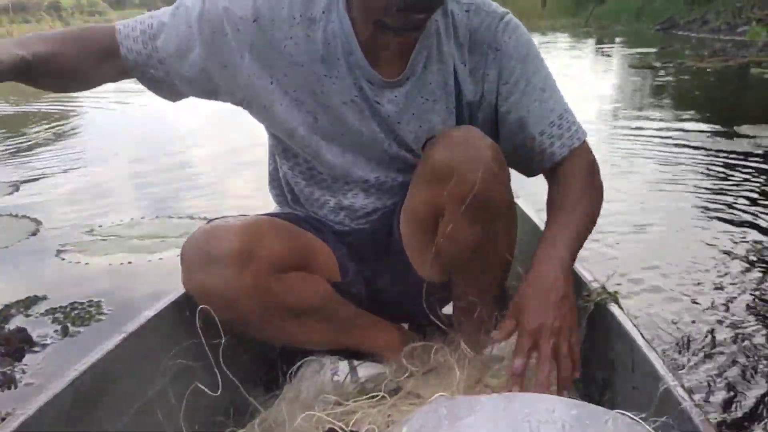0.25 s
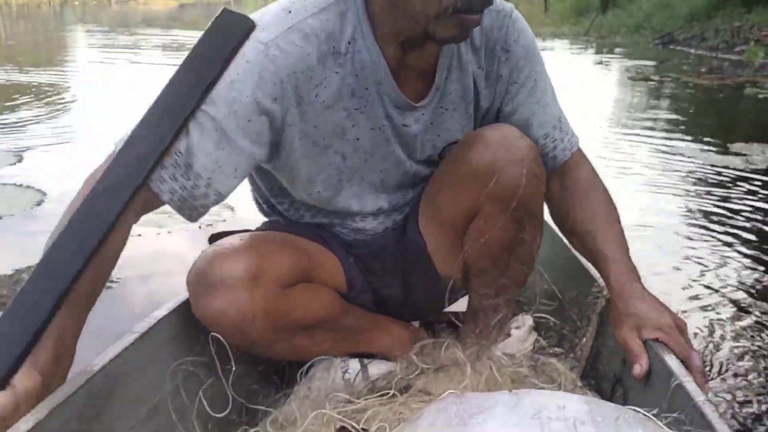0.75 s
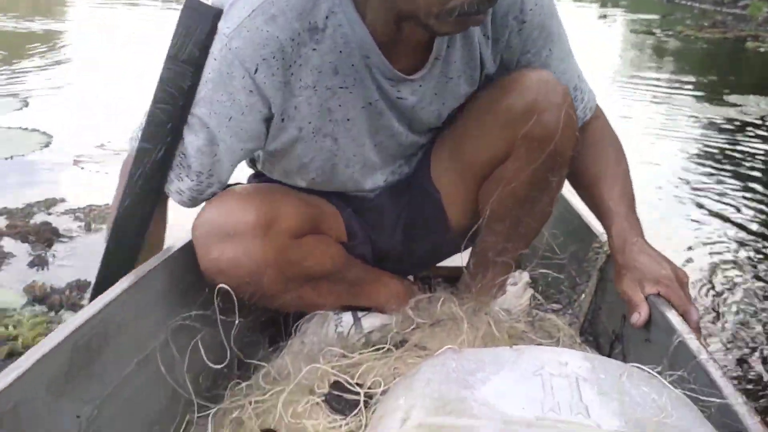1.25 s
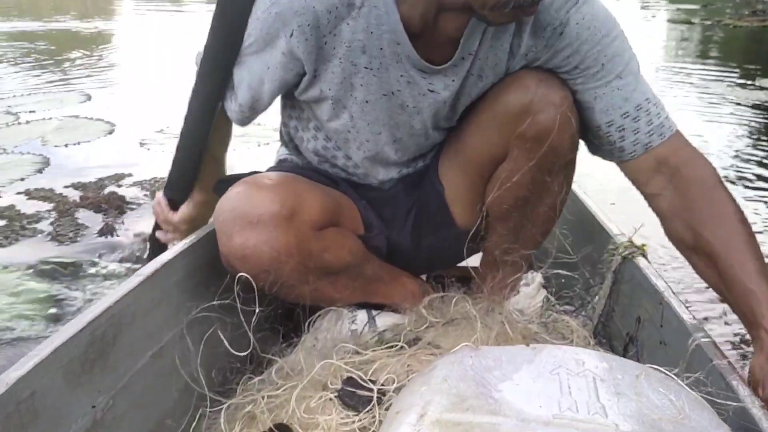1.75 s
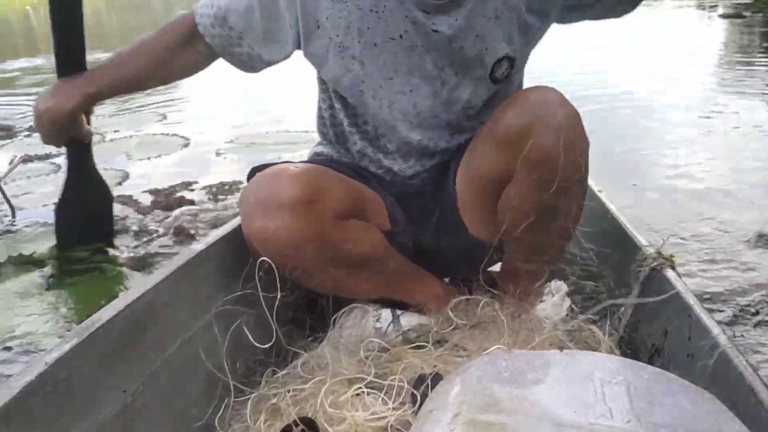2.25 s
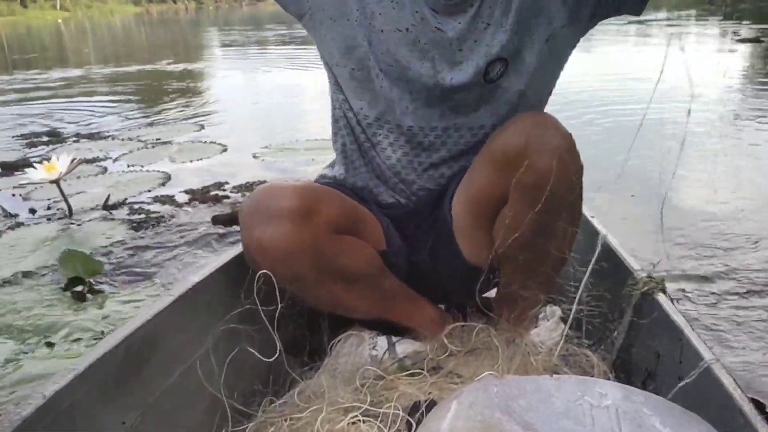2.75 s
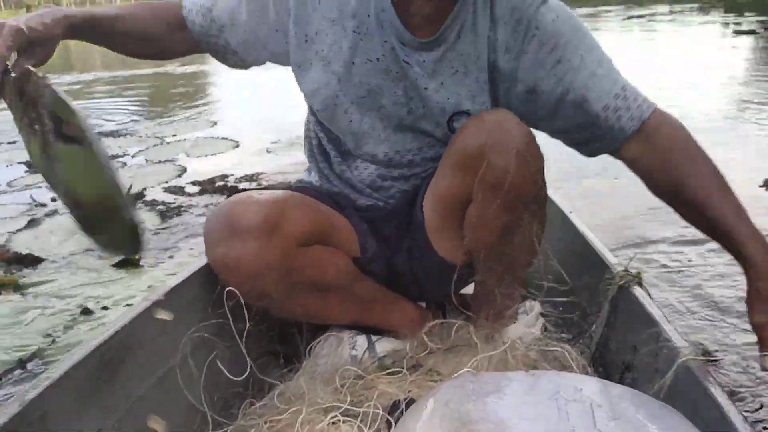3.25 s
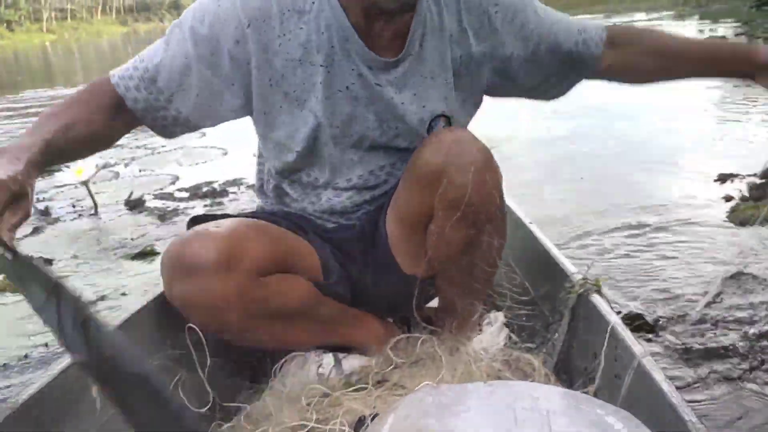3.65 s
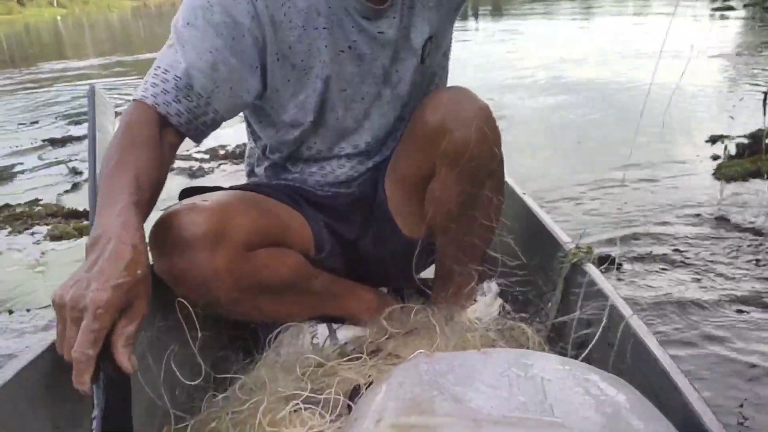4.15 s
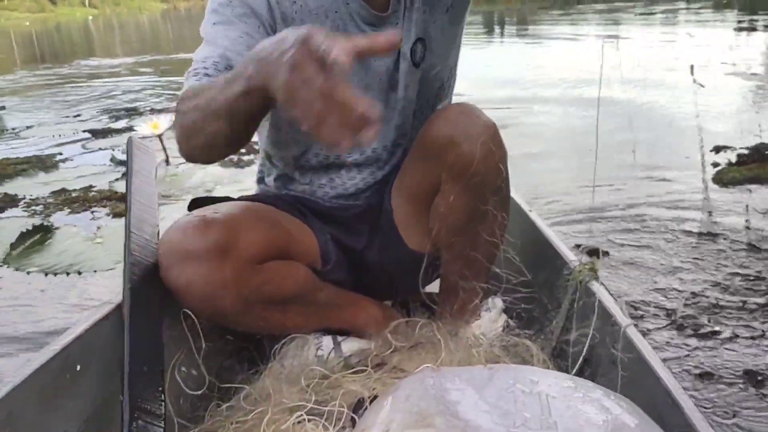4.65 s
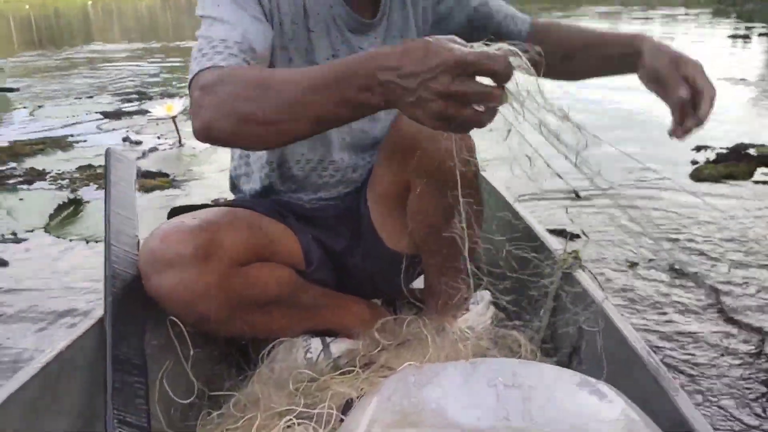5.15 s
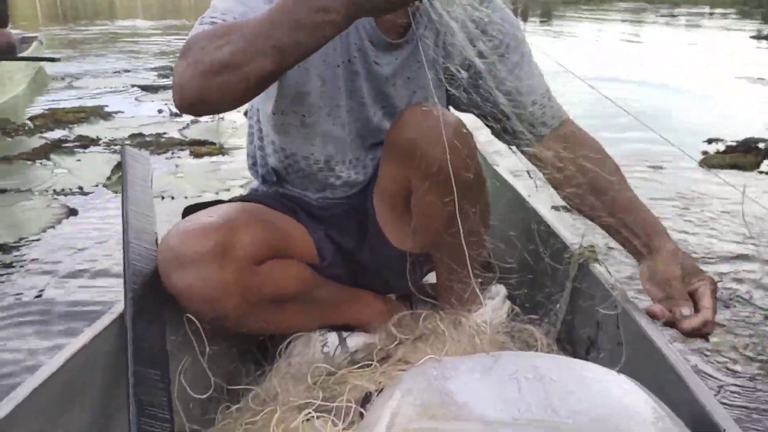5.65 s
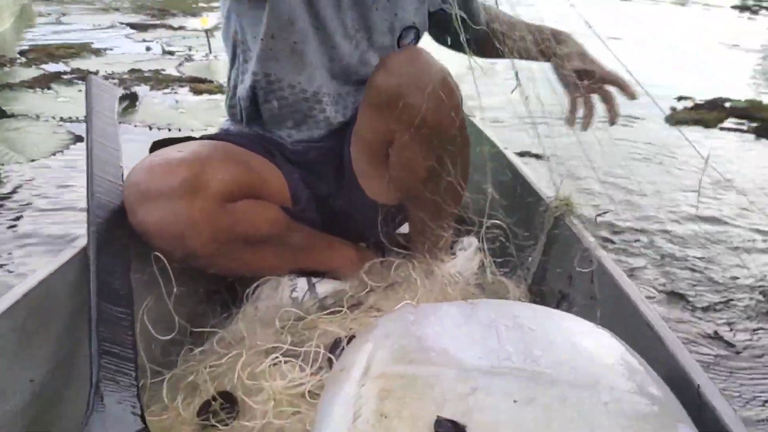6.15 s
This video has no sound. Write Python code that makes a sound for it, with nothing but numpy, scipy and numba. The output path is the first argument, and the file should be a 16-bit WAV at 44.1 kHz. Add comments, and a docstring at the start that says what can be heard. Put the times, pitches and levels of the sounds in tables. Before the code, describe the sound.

Hollow hull knocks, stirred trickling water and a brief crisp net shake, over quiet bank insects, faint honks and thin bird whistles.

```python
"""A paddle knocks the hull of a small boat on still water, stirs and drips, while a wet net is shaken and drawn in.
Blows ring the plank modes; close bubbles, gulps and ticks are short decaying sines; stirred water and the net
are dense showers of such rings, and a smooth rush is banded noise. On the banks, near crickets are pulsed tones
and far insects narrow noise; a far honking bird and small whistling, trilling birds are gliding tones with an echo.
Under everything is a soft hush of shaped noise whose upper bands waver at random; the recorder cuts the top."""
import sys
import numpy as np
from scipy import signal
from scipy.fft import rfft, irfft
from scipy.io import wavfile
from scipy.ndimage import uniform_filter1d
from numba import njit

SR = 44100
rng = np.random.default_rng(int(sys.argv[2]) if len(sys.argv) > 2 else 0)


def unload_wav(signal):
    """Save mono or channel-first audio to the path in sys.argv[1] as 16-bit WAV at rate SR, clipped to [-1, 1]."""
    wavfile.write(
        sys.argv[1],
        SR,
        np.round(np.clip(np.atleast_2d(signal).T, -1, 1) * 32767).astype(np.int16),
    )


N = 282240
T = np.arange(N) / SR


def undb(db):
    """Amplitude factor of a level in dB."""
    return 10 ** (np.asarray(db) / 20)


def unit(x):
    """Scale to rms 1."""
    return x / np.sqrt(np.mean(x ** 2))


def noise():
    """White noise over the whole scene."""
    return rng.standard_normal(N)


def band(x, lo_hz, hi_hz, order=2):
    """Butterworth band-pass."""
    edges_hz = [lo_hz, min(hi_hz, .45 * SR)]
    return signal.sosfilt(signal.butter(order, edges_hz, "band", fs=SR, output="sos"), x)


def walk(rate):
    """Random levels held 1 / rate s and smoothed twice; spread near 1."""
    hold = int(SR / rate)
    steps = np.repeat(rng.standard_normal(N // hold + 1), hold)
    return 1.4 * uniform_filter1d(uniform_filter1d(steps, hold), hold)[:N]


def swell_db(s, swell_s, hold_s, fade_db_per_s):
    """Level in dB under the top: a rise of 15 dB per swell_s up to s, a hold, a steady fade."""
    rise = 15 * np.clip(s - T, 0, None) / max(swell_s, 1e-3)
    return -rise - fade_db_per_s * np.clip(T - s - hold_s, 0, None)


def glide(s, from_hz, to_hz, glide_s):
    """Frequency that slides in a straight line from time s."""
    return from_hz + (to_hz - from_hz) * np.clip((T - s) / glide_s, 0, 1)


def tone(hz):
    """Sine of rms 1 that follows a moving frequency."""
    return np.sqrt(2) * np.sin(2 * np.pi * np.cumsum(hz) / SR)


@njit
def rings(n, s, size, hz, t60, octaves, rise):
    """Decaying sines that may glide up as they fade; rise [s] is the length of the push."""
    out = np.zeros(n)
    for e in range(len(s)):
        start, phase = int(s[e] * SR), 0.
        for i in range(min(int(t60[e] * SR), n - start)):
            t = i / SR
            now_hz = min(hz[e] * 2 ** (octaves[e] * t / t60[e]), .45 * SR)
            phase += 2 * np.pi * now_hz / SR
            fade = np.exp(-np.log(1000) * t / t60[e])
            onset = 1 - np.exp(-(t / rise) ** 2)
            out[start + i] += size[e] * np.sin(phase) * fade * onset
    return out


def grains(count, lo_hz, hi_hz, cycles, scatter_db, octaves, tilt=0.86):
    """A steady random shower of small rings, rms 1; a positive tilt favours the high-pitched ones."""
    place, pitch, luck, length = rng.random((count, 4)).T
    hz = lo_hz * (hi_hz / lo_hz) ** pitch
    size_db = scatter_db * np.minimum(-np.log(1 - luck), 4.5)  # the rare giants are capped
    size = undb(size_db) * (hz / lo_hz) ** tilt
    t60 = cycles * (.5 + length) / hz
    shower = rings(N, place * N / SR, size, hz, t60, octaves * length, 0.00029)
    return unit(band(shower, .9 * lo_hz, 1.1 * hi_hz, order=4))


def bursts(s, db, lo_hz, hi_hz, t60):
    """Short decaying banded noise at each time."""
    kick = np.zeros(N)
    np.add.at(kick, (np.asarray(s) * SR).astype(int), undb(db))
    fade = signal.lfilter([1], [1, -np.exp(-np.log(1000) / (t60 * SR))], kick)
    # make up for the power lost outside the band
    return band(fade * noise(), lo_hz, hi_hz) * np.sqrt(SR / 2 / (hi_hz - lo_hz))


def hull():
    """Each blow is a push and a short rattle that shake the plank modes; a dry crack goes with it."""
    # blows: (time [s], level [dB], upper planks over the thud [dB], crack over the thud [dB])
    knocks = [(0.339, -16.5, -7, -12), (0.721, -39, -9, -18), (1.59, -19.5, 3, -34),
              (1.598, -22.5, -0.5, -34), (1.639, -27, -7.5, -36), (1.717, -26, 0, -33),
              (1.721, -15.5, 3, -38), (1.739, -19, 2.5, -25.5), (1.746, -17, -0.5, -32),
              (1.781, -24.5, -5, -21.5), (1.836, -19.5, -11, -32), (1.879, -27.5, -1.5, -18.5),
              (2.547, -38, -12, -22), (3.95, -38, -5, -18), (3.97, -36, -3, -20), (3.988, -35.5, -2.5, -14),
              (4.029, -40, -1, -20), (4.323, -22, -4.5, -20.5), (4.346, -30, -15.5, -24),
              (4.364, -33.5, -13, -16), (4.389, -38, -1.5, -14)]
    # plank modes: (frequency [Hz], level [dB], t60 [s])
    modes = [(129.3, -15, 0.17), (197, -4, .12), (261, 2, 0.075), (319, -5.5, 0.11), (406.3, -2, 0.062),
             (517, 0, 0.094), (602, 2, 0.082), (720, -4, 0.09), (889, -9.5, 0.07), (1113, -8, 0.06),
             (1323, -13, 0.04), (1620, -19, 0.035), (2100, -24, 0.03), (2460, -26.5, 0.027)]
    s, db, upper_db, crack_db = np.transpose(knocks)
    out = bursts(s, db + crack_db - 3.0, 1300, 9000, 0.051)
    out += bursts(s, db + crack_db - 3.5, 2000, 2600, 0.05)  # the crack also sets the upper planks near 2.4 kHz ringing
    for hz, mode_db, t60 in modes:
        plank_db = upper_db if hz > 450 else 0
        blow_db = db + mode_db + plank_db + 1.5 * rng.standard_normal(len(s))
        blow_hz = hz * (1 + 0.0199 * rng.standard_normal(len(s)))
        rise = .0006 + .3 / hz  # low planks take longer to move
        out += rings(N, s, undb(blow_db - 3.5), blow_hz, t60 + 0 * s, 0 * s, rise)
        # the rattle keeps feeding the mode, so it rings unevenly
        reach_hz = 1.8 * 2.58 / t60
        out += bursts(s, blow_db - 18.5, hz - reach_hz, hz + reach_hz, 2.64 * t60)
    return band(out, 95, 12000)


def bubbles():
    """Close single bubbles and drips start with a noisy slap and ring briefly, sliding up a little."""
    # (time [s], level [dB], nominal pitch [Hz])
    drips = [(0.016, -47, 786), (0.204, -38, 770), (0.236, -36, 1050), (0.245, -37, 754),
             (0.588, -31.5, 766), (0.601, -34, 602), (0.674, -45, 1210), (0.831, -32, 757),
             (0.903, -31, 1420), (0.923, -19, 816), (0.934, -32, 700), (0.949, -29, 1020),
             (0.954, -22, 1131), (0.963, -27.5, 1280), (0.972, -33, 700), (0.979, -33.5, 545),
             (1.052, -41, 766), (1.095, -41, 635), (1.119, -30.5, 786), (1.121, -38.5, 2000),
             (1.145, -27.5, 890), (1.161, -29.5, 1604), (1.183, -25, 509), (1.239, -32, 1456),
             (1.673, -31.5, 1390), (1.951, -33.5, 1314), (1.905, -38, 1150), (2.016, -35, 783),
             (2.084, -38.5, 1504), (2.164, -37.5, 1270), (2.283, -39, 1346), (2.354, -33.5, 1170),
             (2.4, -43.5, 644), (2.477, -47, 750), (2.5, -36, 950), (2.528, -31.5, 1190),
             (2.559, -36.5, 836), (2.601, -39, 1090), (2.626, -33.5, 1413), (2.729, -45, 970),
             (2.769, -48.5, 920), (3.086, -50, 1500), (3.375, -55.5, 393), (3.457, -46, 1134),
             (3.491, -45.5, 1360), (3.515, -45, 550), (3.53, -39, 940), (3.541, -29.5, 1204),
             (3.577, -33.5, 983), (3.579, -37.5, 770), (3.651, -50, 2110), (3.676, -48, 2080),
             (3.869, -54, 760), (4.765, -36, 1054), (4.998, -53, 950), (5.34, -61, 560),
             (6.027, -53.5, 1535), (6.069, -53, 1130)]
    s, db, hz = np.transpose(drips)
    octaves = .1 + .3 * rng.random(len(s))
    ringing = rings(N, s - .001, undb(db + 2.5), .97 * hz, .02 + 22 / hz, octaves, .0014)
    slaps = bursts(s, db - 17.5, 500, 2800, 0.03)
    return band(ringing * undb(1.4 * walk(200)), 170, 5000) + slaps


def gulps():
    """Close air pockets swell, then slide up in pitch as they close."""
    # (time [s], level [dB], start pitch [Hz], rise [octaves], t60 [s])
    pockets = [(1.08, -34.5, 330.4, 0.079, 0.091), (1.14, -33.5, 244, 0.071, 0.14),
               (1.215, -30.5, 289.5, 0.19, 0.13), (1.25, -27.5, 314.6, 0.38, 0.098),
               (1.285, -29.5, 308, .6, 0.063), (1.53, -27.5, 440, 2.54, 0.085),
               (1.998, -34.5, 470, .05, 0.11), (3.51, -43, 696, 1.5, 0.07), (6.225, -60.5, 593, 0.25, 0.26)]
    s, db, hz, octaves, t60 = np.transpose(pockets)
    ringing = rings(N, s, undb(db + 7.0), hz, t60, octaves, 0.015)
    return band(ringing * undb(2.2 * walk(150)), 170, 5000)  # their walls wobble


def ticks():
    """Close sharp ticks of drops and cord: a few cycles of ringing and a wide puff of noise."""
    # (time [s], level [dB], centre [Hz])
    taps = [(0.203, -42, 4200), (0.2132, -32.5, 4300), (0.226, -32.5, 4200), (0.2392, -27.5, 6400),
            (0.416, -45, 1800), (0.539, -34, 5330), (0.5975, -21, 5700), (0.706, -30.5, 5410),
            (0.8612, -30.5, 3500), (0.8878, -31, 1310), (0.8875, -32, 2600), (0.9226, -27, 1690),
            (1.0982, -27.5, 3180), (1.162, -32.5, 2080), (1.195, -32, 5200), (1.212, -41.5, 3800),
            (1.269, -40, 1940), (1.295, -32, 6080), (1.8668, -29, 3760), (2.214, -35, 2180),
            (2.327, -37, 2700), (2.3544, -34, 2590), (2.382, -37, 3020), (2.402, -38, 4000),
            (2.5404, -34, 6600), (2.6276, -38, 6470), (2.716, -35.5, 4050), (2.816, -46, 5200),
            (2.869, -46, 10800), (2.892, -50, 11000), (2.9427, -47.5, 2800), (2.944, -42.5, 10200),
            (2.952, -47, 10320), (2.976, -47, 11000), (3.048, -43.5, 5000), (3.067, -50.5, 2700),
            (3.121, -46.5, 11500), (3.4482, -42.5, 2200), (3.491, -44, 2000), (3.9282, -29.5, 3400),
            (4.2413, -35, 4270), (4.474, -39.5, 6700), (4.83, -44, 3560), (4.96, -47, 3360),
            (5.105, -54.5, 3700), (6.0418, -32.5, 6640)]
    s, db, hz = np.transpose(taps)
    ringing = rings(N, s, undb(db + 1.1), hz, 16 / hz, 0 * s, .0001)
    return band(ringing, 800, 15000) + bursts(s, db - 15.5, 1400, 11000, 0.029)


def stirred_water():
    """Four sizes of bubble, from gurgle to fine spray, each a dense shower that comes in spurts."""
    # spells: (loudest from [s], swell [s], hold [s], fade [dB/s],
    #          gurgle [dB], trickle [dB], fizz [dB], spray [dB])
    spells = [(0.0, .02, 0.045, 29, -58.5, -61, -67.5, -78),
              (0.199, 0.034, 0.026, 115, -50.5, -53.5, -58.5, -77),
              (0.348, 0.051, 0.17, 30, -54, -57, -63, -69),
              (0.544, 0.043, 0.059, 46, -56.5, -53, -54, -49.5),
              (0.864, 0.076, 0.11, 13, -61, -50.5, -54.5, -60.5),
              (1.106, 0.2, 0.15, 58, -42.5, -47, -54, -56),
              (1.655, 0.33, 0.43, 113, -47.5, -49.5, -61.5, -66),
              (2.137, 0.1, 0.021, 194, -62, -49.5, -55.5, -53.5),
              (2.363, 0.11, 0.028, 77, -58.5, -47, -50, -55),
              (2.514, 0.17, 0.15, 99, -62, -53.5, -62, -59.5), (2.899, 0.14, .02, 28, -97, -82, -77, -62.5),
              (3.45, 0.02, 0.15, 77, -61, -55, -65.5, -61),
              (3.94, 0.046, 0.18, 133, -63.5, -61, -60.5, -63),
              (4.421, 0.14, 0.037, 149.5, -64, -60, -62, -61),
              (4.695, 0.25, 0.13, 132.5, -84.5, -69.5, -66, -67),
              (5.153, 0.15, 0.17, 60, -81, -71, -86, -88.5),
              (5.92, 0.037, .08, 100.5, -90, -81, -72.5, -76.5),
              (6.052, 0.037, 0.015, 156, -88, -62, -65.5, -74)]
    # the same four sizes when nothing stirs: (level [dB])
    calm_db = [-92, -95, -91, -87]
    power = undb(calm_db)[:, None] ** 2
    for row in spells:
        power = power + np.outer(undb(row[4:]), undb(swell_db(*row[:4]))) ** 2
    gurgle_gain, trickle_gain, fizz_gain, spray_gain = np.sqrt(power)
    gurgle = grains(count=3500, lo_hz=380, hi_hz=900, cycles=20, scatter_db=3.4, octaves=.45)
    trickle = grains(count=7000, lo_hz=850, hi_hz=2200, cycles=20, scatter_db=3.2, octaves=.45, tilt=-.4)
    fizz = grains(count=12000, lo_hz=2175, hi_hz=6770, cycles=30, scatter_db=3.5, octaves=0.28, tilt=0.88)
    # the smallest bubbles blur into a rush
    fizz = unit(fizz + 0.47 * unit(band(noise(), 3800, 6500, order=4)))
    spray = grains(count=12000, lo_hz=8200, hi_hz=13200, cycles=54, scatter_db=6.0, octaves=0)
    spray = unit(spray + 0.73 * unit(band(noise(), 8000, 13200, order=5)))
    out = gurgle_gain * gurgle + trickle_gain * trickle
    out += fizz_gain * undb(1.64 * walk(30)) * fizz
    out += spray_gain * undb(1.8 * walk(40)) * spray
    return undb(0.74 * walk(18)) * out


def blade_rush():
    """Water sheeting off the blade: smooth noise in three bands, each wavering in level."""
    # (loudest from [s], swell [s], hold [s], fade [dB/s], level [dB])
    sheets = [(.55, 0.073, .27, 30.5, -57), (2.356, .06, 0.065, 90, -63)]
    # (centre [Hz], width [Hz], level [dB])
    rush_bands = [(4450, 500, -2.5), (5400, 940, 0), (6100, 500, -3)]
    rush = 0
    for hz, width, db in rush_bands:
        rush = rush + undb(db + 2 * walk(12)) * unit(band(noise(), hz - width / 2, hz + width / 2))
    return rush * sum(undb(row[4] + swell_db(*row[:4])) for row in sheets)


def net():
    """The wet net snaps taut: a dense crackle of meshes flinging water; a weaker tail trails each snap."""
    # (loudest at [s], crackle [dB], hold [s], coarse drops over the crackle [dB])
    snaps = [(4.647, -30, 0.034, -20), (4.748, -38, 0.021, -5.5)]
    swell_s, fade_db_per_s, sag_db_per_s = 0.0094, 2202, 280  # it sags from the moment it is loudest
    tail_db, tail_fade_db_per_s = -22, 134
    bright = grains(count=30000, lo_hz=5100, hi_hz=11360, cycles=6.5, scatter_db=3.0, octaves=0)
    body = grains(count=14000, lo_hz=1006, hi_hz=4500, cycles=9.1, scatter_db=3.5, octaves=0)
    out = 0
    for s, db, hold, body_db in snaps:
        sag_db = sag_db_per_s * np.clip(T - s, 0, None)
        gain = undb(swell_db(s, swell_s, hold, fade_db_per_s) - sag_db)
        gain += undb(tail_db + swell_db(s, swell_s, hold, tail_fade_db_per_s))
        out = out + undb(db) * gain * (bright + undb(body_db) * body)
    return out


def near_crickets():
    """Two near crickets chirp evenly in buzzing packets of a pure tone."""
    # phrases: (first chirp [s], end [s], period [s], pitch [Hz], first level [dB], last level [dB])
    phrases = [(0.0, 1.65, 0.093, 6800, -50.5, -49), (1.794, 1.77, .0944, 6750, -45, -71),
               (2.26, 2.45, 0.1, 6790, -53, -51), (3.495, 4.3, 0.097, 6770, -54.5, -60.5),
               (5.757, 6.4, 0.097, 6790, -57.5, -51), (0.145, 0.89, 0.09, 6700, -56, -54.5),
               (2.428, 3.25, .0933, 6630, -45.5, -52.5), (4.192, 4.47, 0.085, 6640, -60, -52),
               (4.845, 5.33, 0.091, 6630, -55, -60), (5.95, 6.4, .0928, 6630, -53, -45.5)]
    out = np.zeros(N)
    t = np.arange(int(0.038 * SR)) / SR
    strokes = 1 - 0.27 * np.cos(np.pi * 185 * t) ** 2  # each wing stroke is one pulse
    for first, end, period, hz, first_db, last_db in phrases:
        chirp = np.sin(np.pi * t / t[-1]) * strokes * np.sin(2 * np.pi * hz * t)
        for s in np.arange(max(first, 0), end, period):
            start = int(s * SR)
            db = np.interp(s, [first, end], [first_db, last_db]) + 2 * rng.standard_normal()
            out[start:start + len(t)] += undb(db) * chirp[:N - start]
    return out


def far_insects():
    """Far insects blur into narrow rasping bands of noise, each wavering in level."""
    # (time [s], high band [dB], low band [dB])
    chorus = [(0.0, -61.5, -83), (0.59, -62, -65), (1.18, -61.5, -63), (1.6, -66.5, -91),
              (2.46, -72.5, -64), (3.05, -75, -77), (3.58, -74.5, -83.5), (4.4, -62.5, -66.5),
              (5.3, -64, -68.5), (5.79, -62.5, -89), (6.4, -61.5, -76)]
    s, high_db, low_db = np.transpose(chorus)
    high_db, low_db = np.interp(T, s, high_db), np.interp(T, s, low_db)
    out = undb(high_db + 1.5 * walk(150)) * unit(band(noise(), 8350, 8850, order=3))
    out += undb(low_db + 3.3 * walk(16)) * unit(band(noise(), 6150, 6350, order=3))
    out += undb(-72.0 + 3.8 * walk(21)) * unit(band(noise(), 6550, 6850, order=3))
    out += undb(-72.5 + 3.7 * walk(9.1)) * unit(band(noise(), 11300, 11750, order=3))
    out += undb(-76.5 + 3.8 * walk(4)) * unit(band(noise(), 9100, 9400))
    out += undb(-85.0 + 3.6 * walk(5)) * unit(band(noise(), 3070, 3130))
    return out


def honks():
    """Far honks show the partials that a throat resonance lifts; hoarse ones waver and carry breath."""
    # (loudest from [s], swell [s], hold [s], fade [dB/s], third partial from [Hz], to [Hz], glide [s],
    #  its level [dB], fourth partial over it [dB], hoarseness [1])
    calls = [(2.602, 0.011, .01, 86, 1223, 1172, .2, -58.5, -18, .11),
             (3.202, .008, 0.011, 500, 1244, 1177, 0.032, -59, -3.5, 0.08),
             (3.251, 0.037, 0.052, 300, 1183, 1171, 0.096, -48.5, -26.5, 0.09),
             (3.678, .02, 0.036, 35, 1189, 1247, .15, -53.5, -9, 0.2),
             (5.086, 0.052, 0.025, 200, 1145, 1192, 0.047, -64.5, -12, .6),
             (5.18, .05, .12, 300, 1240, 1181, .1, -63.5, -1.5, 0.76),
             (5.325, 0.057, 0.068, 190, 1266, 1294, .1, -68.5, -10, 1.61)]
    out = 0
    for s, swell, hold, fade, from_hz, to_hz, glide_s, db, fourth_db, hoarse in calls:
        waver = 1 + hoarse * (0.0154 * walk(30) + 0.0202 * walk(300))
        third_hz = glide(s, from_hz, to_hz, glide_s) * waver
        pitch = third_hz / 3
        rough = hoarse * (.55 * tone(5 * pitch) + .5 * tone(2 * pitch)) * undb(3 * walk(20))
        stack = tone(third_hz) + undb(fourth_db) * (tone(4 * pitch) + rough)
        breath = unit(band(noise(), 1060, 1870, order=3))  # rushing air in the same throat band
        call = stack * (1 + np.clip(hoarse, 0, 1) * walk(150)) + 0.58 * hoarse * breath
        spent_db = 600 * np.clip(T - s - .19, 0, None)  # after 0.19 s the breath runs out
        out = out + undb(db + swell_db(s, swell, hold, fade) - spent_db) * call
    return out


def whistles():
    """Thin whistles are gliding near sines, blurred in pitch and wavering in level."""
    # (time [s], hold [s], fade [dB/s], from [Hz], to [Hz], glide [s], level [dB], blur [Hz])
    calls = [(3.333, 0.03, 149.5, 6840, 7010, 0.041, -56.5, 89.7),
             (3.385, 0.095, 200, 7100, 7550, .08, -62, 159.7),
             (3.43, 0.057, 249.5, 7850, 7900, .04, -63, 90.5),
             (4.093, 0.018, 117, 8280, 7410, 0.047, -54, 60),
             (4.568, 0.057, 298.5, 8020, 7300, 0.064, -57.5, 60),
             (4.793, 0.042, 400.5, 7870, 8250, 0.061, -53.5, 60),
             (5.017, 0.024, 70, 7900, 7100, 0.075, -59.5, 80), (5.09, .2, 150.5, 4330, 4280, .3, -79, 50),
             (5.296, .04, 182, 7740, 8050, 0.0406, -60, 89),
             (5.491, 0.033, 199.5, 4880, 6400, 0.04, -74.5, 250),
             (5.55, 0.058, 149, 6410, 6540, 0.047, -64.5, 120), (5.5, 0.28, 150, 3950, 4210, 0.2, -77, 170),
             (5.801, 0.27, 120, 4190, 3720, 0.19, -74.5, 44.9)]
    out = 0
    for s, hold, fade, from_hz, to_hz, glide_s, db, blur_hz in calls:
        level_db = db + swell_db(s, 0.014, hold, fade) + 3.3 * walk(70)
        out = out + undb(level_db) * tone(glide(s, from_hz, to_hz, glide_s) + blur_hz * walk(500))
    return out


def trills():
    """Rising trills are gliding near sines throbbing in separate pips."""
    # (time [s], length [s], from [Hz], to [Hz], level [dB])
    calls = [(0.678, 0.15, 3480, 3560, -65.5), (2.1, .19, 3470, 3560, -64), (3.602, 0.26, 3330, 3660, -63),
             (3.83, 0.082, 3720, 4080, -64.5), (5.152, 0.25, 3290, 3680, -67.5),
             (5.387, 0.096, 3710, 4060, -61)]
    pips_hz, sharpness, growth_db = 43.2, 2, 5.5
    throb = np.exp(sharpness * (np.sin(2 * np.pi * pips_hz * T) - 1)) * 2
    out = 0
    for s, length, from_hz, to_hz, db in calls:
        hz = glide(s, from_hz, to_hz, length) * (1 + 0.012 * walk(60) + 0.01207 * walk(500))
        # it grows over the first half of its length
        below_db = growth_db * np.clip(1 - (T - s) / (0.5 * length), 0, 1)
        level_db = db + swell_db(s, .01, length, 230) - below_db + 2.5 * walk(45)
        out = out + undb(level_db) * throb * tone(hz)
    return out


def birds():
    """The banks echo all the birds: a faint decaying noise tail follows each call."""
    calls = honks() + whistles() + trills()
    tail = np.arange(int(.4 * SR)) / SR
    echo = rng.standard_normal(len(tail)) * np.exp(-np.log(1000) * tail / .5)
    return calls + undb(-38) * signal.fftconvolve(calls, echo)[:N]


def background_hush():
    """A soft hush: shaped noise, nearly steady in the bass, whose narrow bands above waver at random in level."""
    # spectrum of the hush: (frequency [Hz], relative level per Hz [dB])
    spectrum = [(15, -7.5), (60, -4), (250, -4), (450, -19), (900, -32), (2200, -25), (3500, -22),
                (5000, -41), (7300, -24.5), (10200, -31), (11500, -16.5), (13200, -12.5), (13900, -32.5),
                (22050, -39.5)]
    hz, db = np.transpose(spectrum)
    f = np.fft.rfftfreq(N, 1 / SR) + 1
    shape = undb(np.interp(np.log(f), np.log(hz), db))
    hush = undb(-71) * unit(irfft(rfft(noise()) * shape, N))
    edges_hz = [10] + list(np.geomspace(450, 19000, 20))
    depth_db = [.6] + [5.5] * (len(edges_hz) - 2)
    out = 0
    for lo, hi, depth in zip(edges_hz, edges_hz[1:], depth_db):
        out = out + undb(depth * walk(7)) * band(hush, lo, hi, order=3)
    return out


def scene():
    """Boat and water close by, then the banks, then the background hush; one channel."""
    boat = hull() + bubbles() + gulps() + ticks() + stirred_water() + blade_rush() + net()
    banks = near_crickets() + far_insects() + birds()
    return (boat + banks + background_hush())[None]


def record(dry):
    """The recorder cuts the top steeply above 15.6 kHz."""
    return signal.sosfilt(signal.ellip(12, .2, 80, 15600, fs=SR, output="sos"), dry)


dry = scene()
out = record(dry)
unload_wav(out)
```